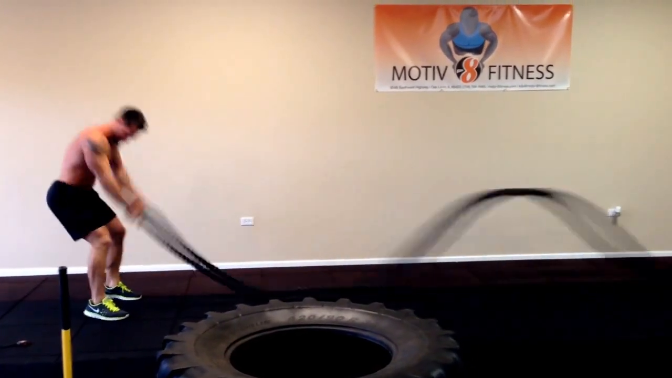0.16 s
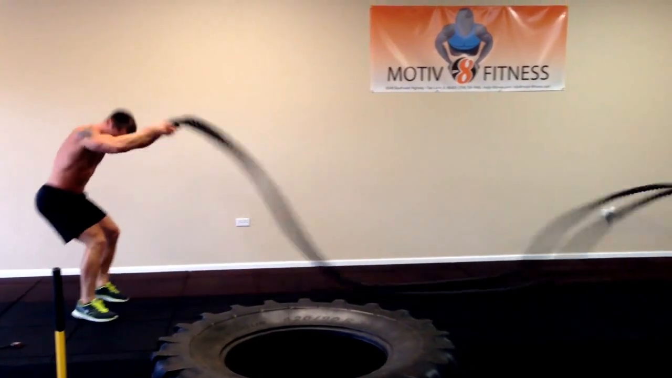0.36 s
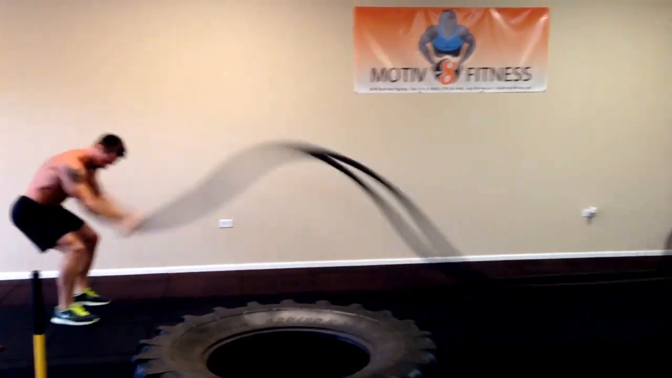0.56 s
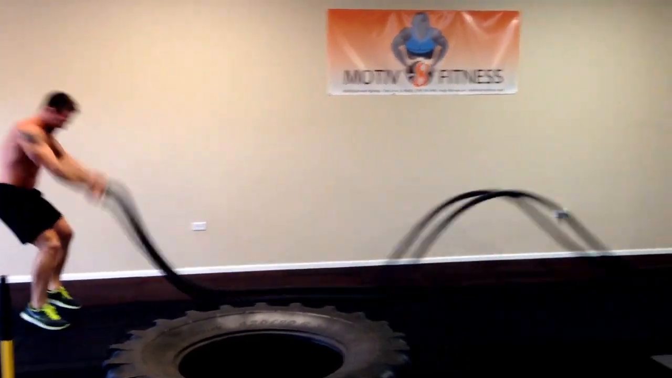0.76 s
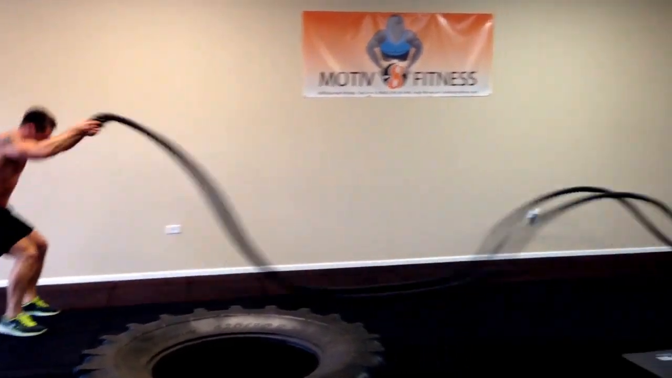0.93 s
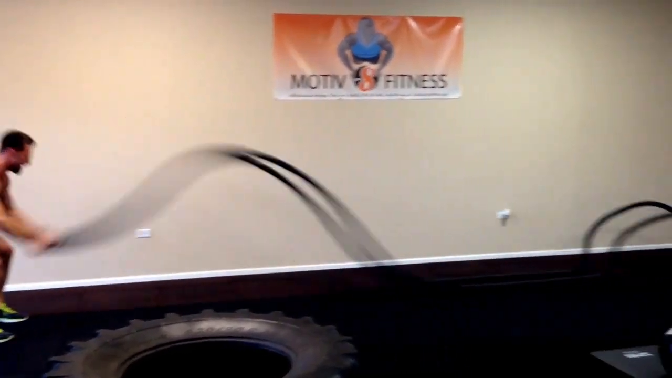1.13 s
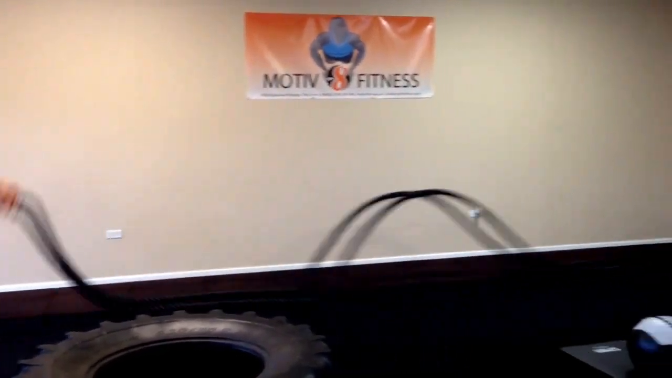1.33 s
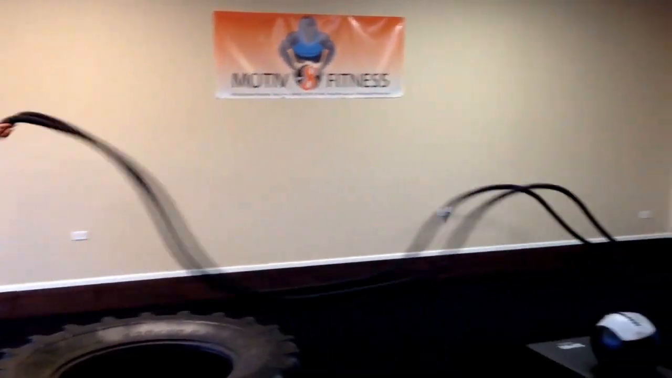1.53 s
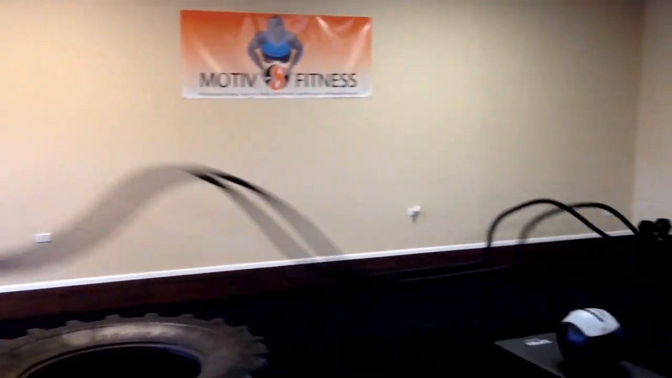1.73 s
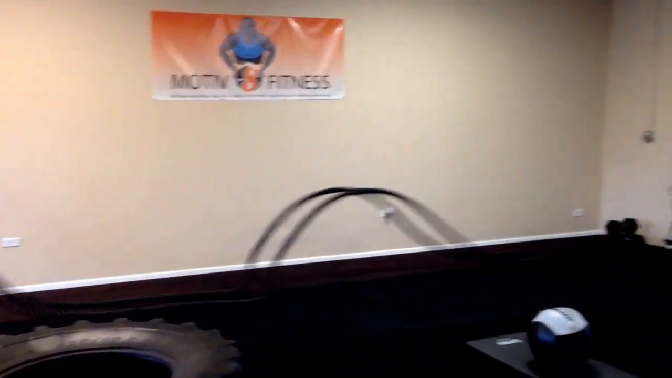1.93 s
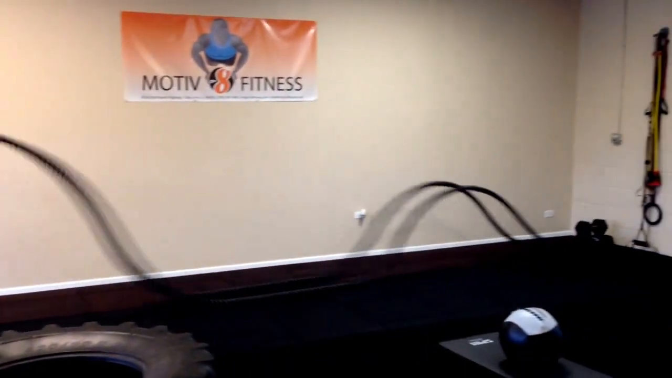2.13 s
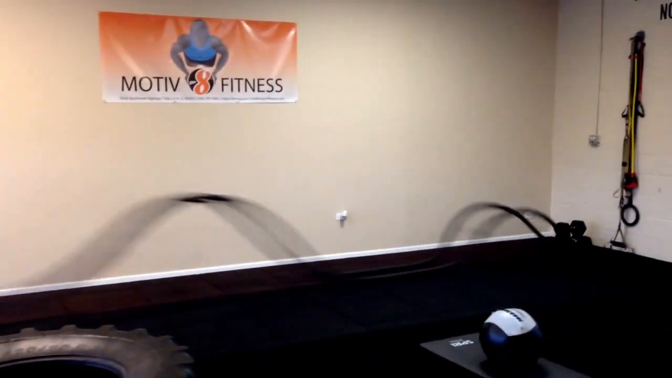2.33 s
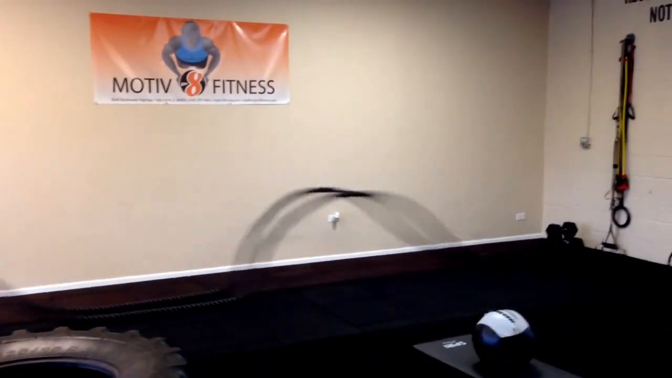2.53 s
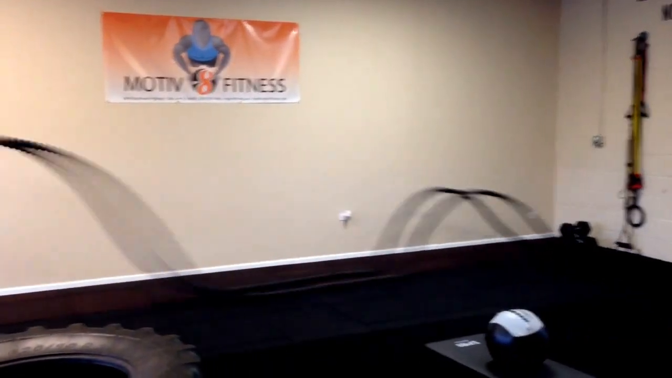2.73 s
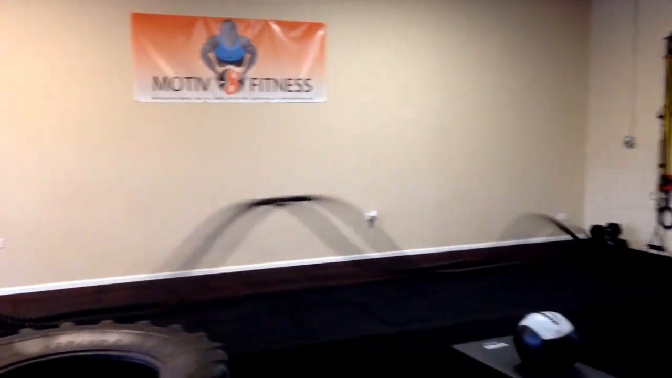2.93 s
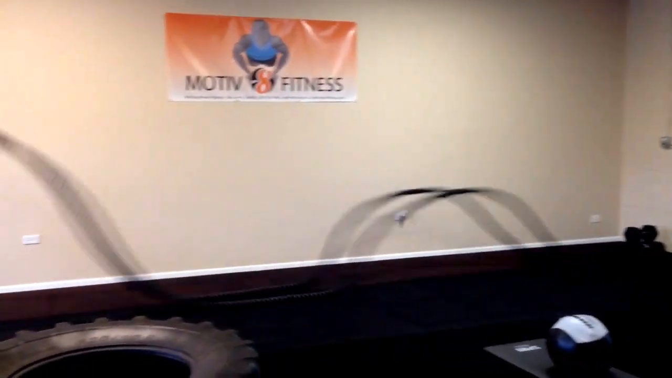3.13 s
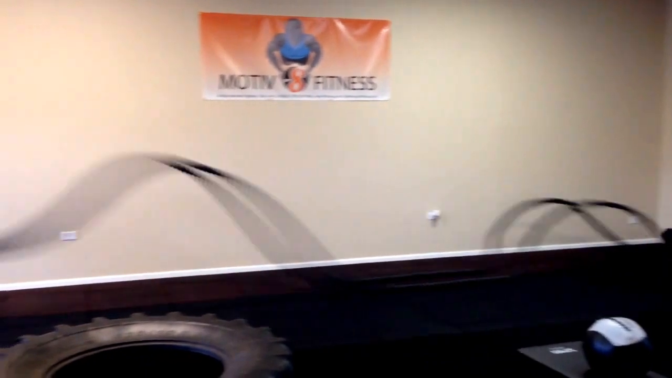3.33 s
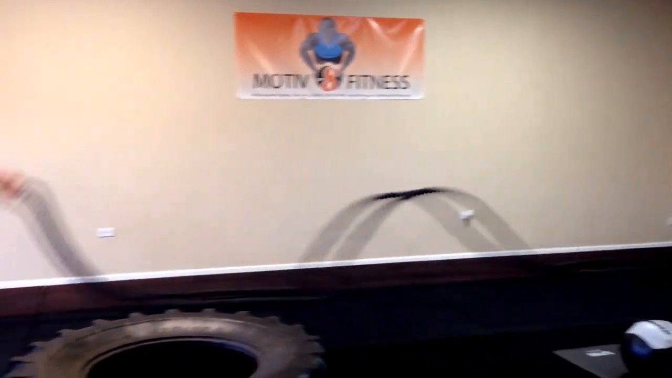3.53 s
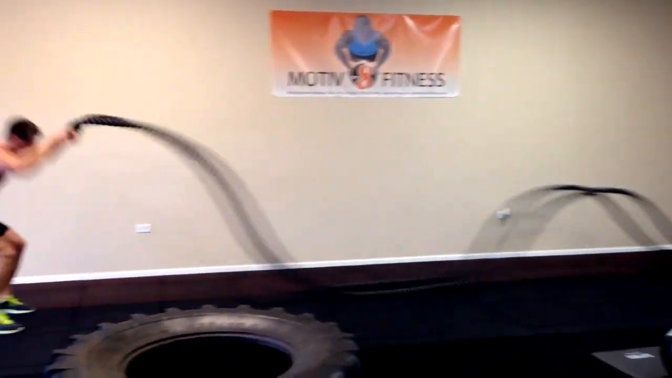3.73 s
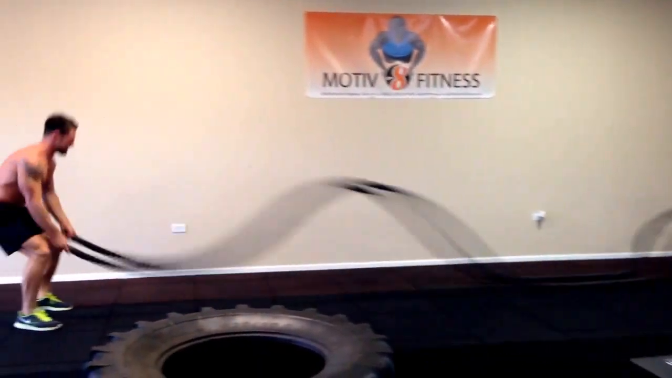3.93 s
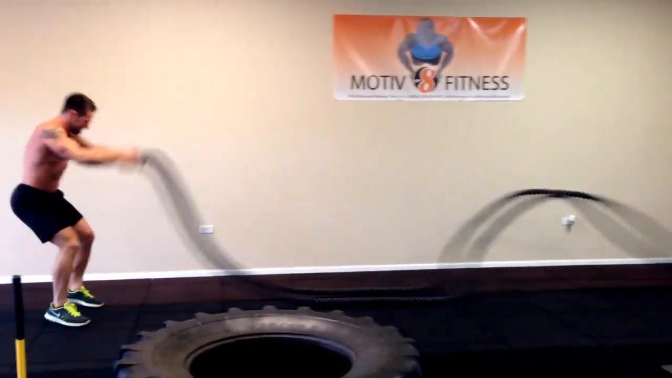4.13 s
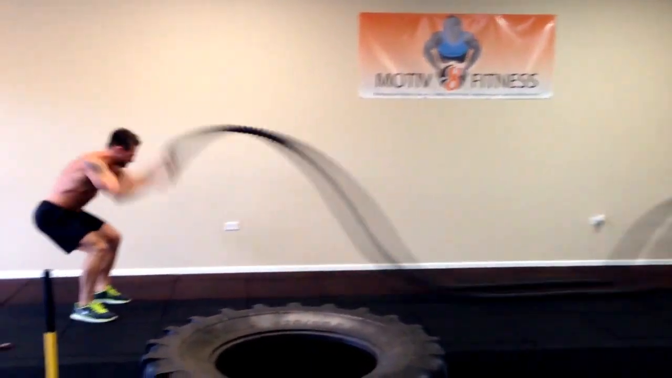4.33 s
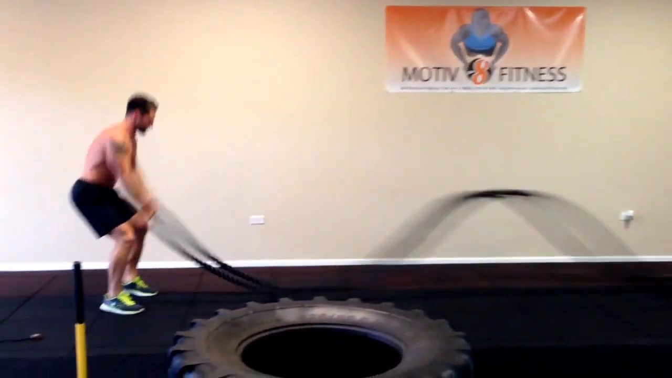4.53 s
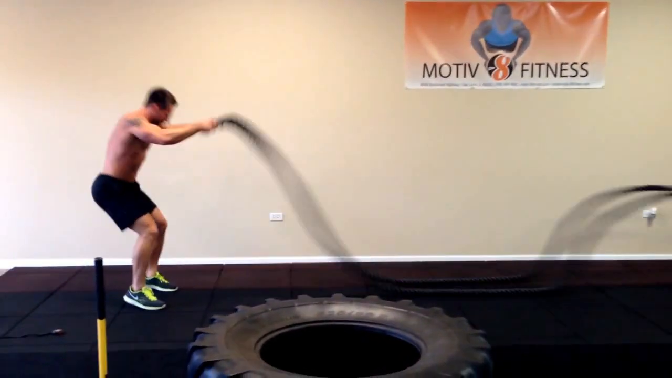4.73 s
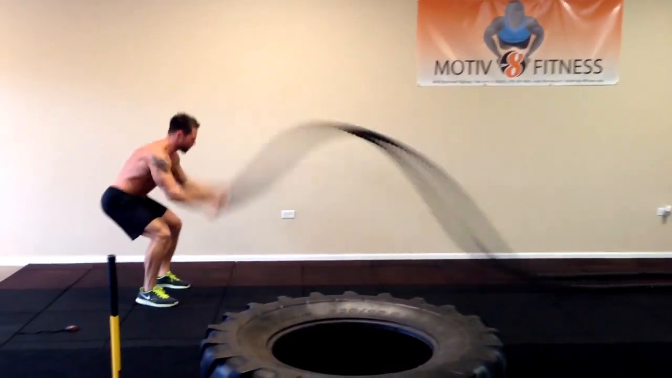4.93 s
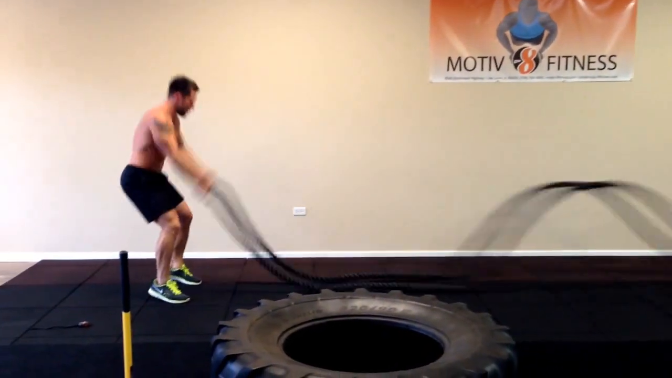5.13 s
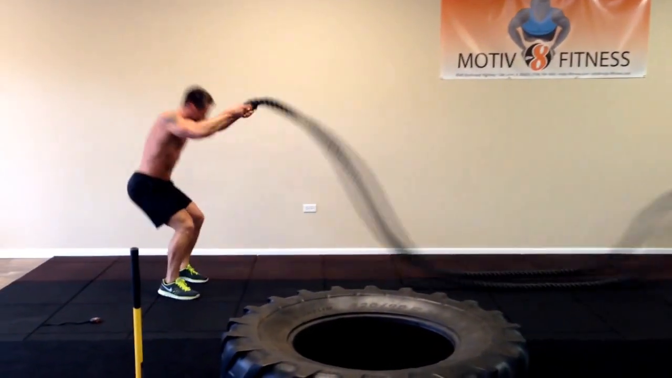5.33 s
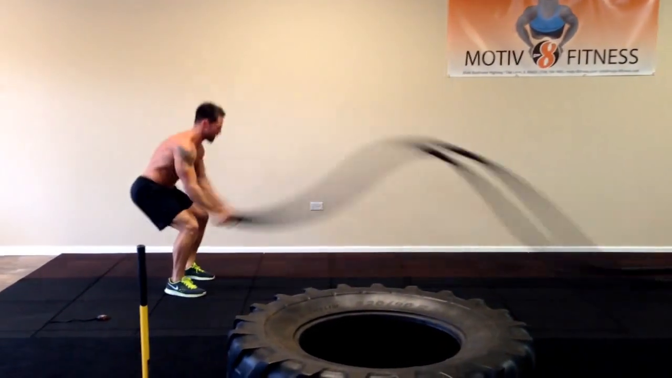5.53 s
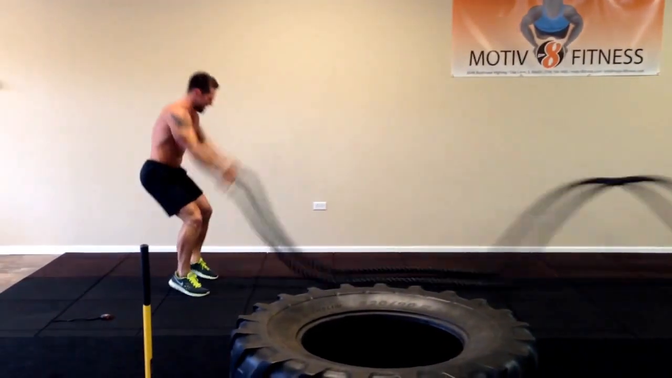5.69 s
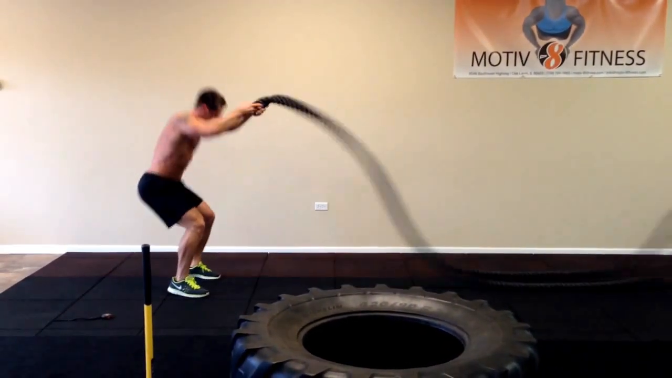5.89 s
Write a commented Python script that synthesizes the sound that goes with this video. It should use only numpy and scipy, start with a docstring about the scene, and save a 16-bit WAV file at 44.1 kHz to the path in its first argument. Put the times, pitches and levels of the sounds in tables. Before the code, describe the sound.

Steady, thudding rope slaps on a rubber mat, with faint swishes and a short boomy room echo, over low ventilation hum.

```python
"""Heavy slaps on a rubber gym floor, about two a second, as two twisted exercise ropes are slammed down.
Each begins as a swish of filtered noise, then slaps and rolls along the mat as runs of small impacts.
Noise bursts make the slack's thud and the floor's boom; the wave runs on and slaps again near the anchor.
The bare room answers every blow with decaying noise and a few standing waves, over steady ventilation."""
import sys
import numpy as np
from scipy import signal
from scipy.fft import rfft, irfft, next_fast_len
from scipy.io import wavfile
from scipy.ndimage import uniform_filter1d, minimum_filter1d, map_coordinates

SR = 44100
rng = np.random.default_rng(int(sys.argv[2]) if len(sys.argv) > 2 else 0)


def store_pcm(level_fs):
    """Save levels as 16-bit WAV."""
    pcm = np.round(np.clip(level_fs, -1, 1) * 32767).astype(np.int16)
    wavfile.write(sys.argv[1], SR, np.atleast_2d(pcm).T)


N = 267113  # samples in the scene
T = np.arange(SR) / SR  # the second in which one blow dies away, in s


def amp(db):
    """Logarithmic level: decibels become an amplitude ratio."""
    return 10 ** (np.asarray(db) / 20)


def unit(x):
    """Root-mean-square normalisation: scale to rms 1."""
    return x / np.sqrt(np.mean(x ** 2) + 1e-20)


def along(points, hz):
    """Logarithmic pitch scale: (Hz, value) points are interpolated on a log frequency axis."""
    f, v = np.transpose(points)
    return np.interp(np.log(hz + 1), np.log(f + 1), v)


def filtered(x, response):
    """Linear filtering: the spectrum is multiplied by a complex response of frequency."""
    size = 2 * next_fast_len(len(x) // 2 + 4096)
    hz = np.fft.rfftfreq(size, 1 / SR)
    return irfft(rfft(x, size) * response(hz), size)[:len(x)]


def coloured(x, points):
    """Minimum phase: folding the cepstrum gives a causal filter with the given spectrum."""
    def response(hz):
        cepstrum = irfft(np.log(amp(along(points, hz))))
        half = len(cepstrum) // 2
        cepstrum[1:half] *= 2
        cepstrum[half + 1:] = 0
        return np.exp(rfft(cepstrum))
    return filtered(x, response)


def resonances(modes, hz):
    """Damped resonance: the complex band-pass response of each (Hz, width in Hz, dB) mode."""
    return [amp(db) * 1j * hz * width / (centre * centre - hz * hz + 1j * hz * width)
            for centre, width, db in modes]


def add(track, s, x):
    """Superposition: sum x into the track from time s in seconds."""
    start = max(round(s * SR), 0)
    track[start:start + len(x)] += x[:max(N - start, 0)]


def contacts(rate_hz, scatter, rise, t60):
    """Impulse train: a dying run of small impacts; scatter makes their spacing and size uneven."""
    gaps, sizes = np.exp(scatter * rng.standard_normal((2, 1500)))
    when = (np.cumsum(gaps) - gaps[0]) / rate_hz
    place = np.minimum(when * SR, SR).astype(int)
    hits = np.bincount(place, sizes, SR + 1)[:SR]
    onset = 1 - np.exp(-(T + 1 / SR) / rise)
    return hits * onset * amp(-60 * T / t60)


def puff(rise, t60):
    """Dense-impact limit: countless tiny contacts merge into a burst of noise."""
    onset = 1 - np.exp(-T / rise)
    return rng.standard_normal(SR) * onset * amp(-60 * T / t60)


# Reverberation of the gym. Each row: frequency in Hz, time to decay by 60 dB in s.
GYM_DECAY = [(60, 0.64), (150, 1.0), (350, 0.63), (700, 0.45), (1500, 0.48), (4000, 0.57), (12000, 0.52)]


def in_gym(x, wet_db):
    """Diffuse reverberation: a blow plus the room's decaying noise, with rms 1 over its first 40 ms."""
    hz, t, z = signal.stft(rng.standard_normal(SR), SR, nperseg=256)
    decay = amp(-60 * t / along(GYM_DECAY, hz)[:, None])
    tail = signal.istft(z * decay, SR, nperseg=256)[1][:SR]
    room = amp(wet_db) * tail * (1 - np.exp(-T / 0.0045)) / np.sqrt(SR / 20)
    room[0] += 1  # direct sound
    heard = signal.fftconvolve(x, room)[:SR]
    return heard / np.sqrt(np.mean(heard[:SR // 25] ** 2))


# Spectrum of the ventilation. Each row: frequency in Hz, relative level in dB.
AIR_COLOUR = [(20, -42), (45, -20), (85, -1), (105, -18), (135, 1), (400, -3), (560, -11), (850, -18),
              (1300, -20.5), (2350, -21.5), (2650, -28.5), (6000, -31.5), (15000, -37.5)]


def room_tone():
    """Stationary noise: steady ventilation, with the dying ring of an earlier slam at the start."""
    air = amp(-48.5) * unit(coloured(rng.standard_normal(N), AIR_COLOUR))
    ring = coloured(puff(rise=0.00036, t60=0.27), FAR_KNOCK_COLOUR)
    add(air, 0, amp(-47) * in_gym(ring, wet_db=3))
    return air


# Spectrum of rope rushing through air. Each row: frequency in Hz, relative level in dB.
SWISH_COLOUR = [(500, -13), (2000, -1), (4000, 1.5), (7000, 1.5), (10000, -4.5), (15000, -19)]
# Spectrum of fibres scraping the mat. Each row: frequency in Hz, relative level in dB.
FIBRE_COLOUR = [(800, -19), (2500, -1), (4200, 9), (6500, 3), (9500, -1.5), (15000, -14)]
SWISH_DB, SCUFF_DB = -59.0, -51.5  # swish at its peak; scuff over its first 40 ms


def hiss():
    """Turbulence and friction: the ropes swish through the air, then their fibres scuff as they lie down."""
    out = np.zeros(N)
    for s, *_ in SLAMS:
        swing = np.exp(-((T - .165) / 0.096) ** 2)
        swish = swing * unit(coloured(rng.standard_normal(SR), SWISH_COLOUR))
        add(out, s - .16, amp(SWISH_DB) * swish)
        drag = (1.6 + T / 0.06) / (1 + (T / 0.085) ** 6)  # more and more rope scrapes, until it lies still
        # the fibres catch and slip: a smooth random level with 55 points a second
        grip = amp(2 * map_coordinates(rng.standard_normal(64), [T * 55], mode="nearest"))
        scuff = coloured(drag * grip * puff(rise=0.0034, t60=2.6), FIBRE_COLOUR)
        add(out, s - .001, amp(SCUFF_DB) * in_gym(scuff, wet_db=-4))
    return out


# The wave coming down near the anchor. Each row: start in seconds, knock level in dB, patter level in dB,
# time that the landing takes in s. Levels are rms over 40 ms, before standing waves and limiter.
FAR_SLAPS = [(0.404, -35.5, -32.5, 0.0019), (0.951, -33, -38.5, 0.0034), (1.526, -33.5, -37.5, 0.0044),
             (2.09, -28.5, -40, 0.0026), (2.64, -33.5, -39.5, 0.012), (3.199, -33.5, -43, 0.0097),
             (3.74, -33.5, -34, 0.0055), (4.268, -35.5, -44, .03), (4.806, -28.5, -38.5, 0.024),
             (5.361, -30.5, -35.5, 0.00337), (5.918, -30.5, -38.5, 0.0082)]
# Spectrum of the dull knock. Each row: frequency in Hz, relative level in dB.
FAR_KNOCK_COLOUR = [(50, -48), (160, -12), (260, -3.5), (335, 1), (600, -6.5), (900, -15.5), (2000, -37),
                    (6000, -82)]
# Spectrum of the patter. Each row: frequency in Hz, relative level in dB.
PATTER_COLOUR = [(300, -10.5), (650, 10), (1000, -5), (1500, -18), (2200, -28.5), (4000, -61)]
# Spectrum of the rattle. Each row: frequency in Hz, relative level in dB.
RATTLE_COLOUR = [(700, -17.5), (1400, 5.5), (2200, -11), (2900, -22), (5000, -26), (15000, -41)]
RATTLE_DB, RATTLE_FADE_DB_PER_S = -46, 2  # level at time 0 for an instant landing; fade as the set goes on
RATTLE_LOSS_DB_PER_S = 398  # the gentler the landing, the less it rattles


def far_slaps():
    """Travelling wave: the spent wave drops with a dull knock, then patter and rattle as the ropes lie down."""
    out = np.zeros(N)
    for s, knock_db, patter_db, landing in FAR_SLAPS:
        knock = coloured(puff(rise=landing + 0.003, t60=0.054 + landing), FAR_KNOCK_COLOUR)
        add(out, s + landing / 2 - .003, amp(knock_db) * in_gym(knock, wet_db=1.5))
        lying_down = contacts(900, scatter=0.33, rise=landing, t60=0.19) / (1 + (T / 0.062) ** 6)
        patter = coloured(lying_down, PATTER_COLOUR)
        add(out, s - .001, amp(patter_db) * in_gym(patter, wet_db=-6.0))
        rattle_db = RATTLE_DB - RATTLE_FADE_DB_PER_S * s - RATTLE_LOSS_DB_PER_S * landing
        rattle = coloured(lying_down, RATTLE_COLOUR)
        add(out, s, amp(rattle_db) * in_gym(rattle, wet_db=-2.0))
    return out


# Spectrum of slack rope landing. Each row: frequency in Hz, relative level in dB.
THUD_COLOUR = [(40, -30.5), (130, -15), (230, -3), (370, 6), (620, -5.5), (1000, -10.5), (1800, -31.5),
               (3000, -39.5), (15000, -83)]
# Spectrum of the floor under the ropes' weight. Each row: frequency in Hz, relative level in dB.
BOOM_COLOUR = [(25, -30), (55, -9.5), (75, -16), (110, -5), (140, -3), (190, -0.5), (300, -28), (800, -57),
               (3000, -92)]
SLACK_DB, SLACK_GROWS = -22.5, 0.26  # thud after a usual slap; dB gained per dB of slap
BOUNCE_S, BOUNCE_SPREAD_S, BOUNCE_LOSS_DB = .184, .008, 9  # the loose loops drop once more after the slap
BOOM_DB = -41.5


def thuds():
    """Inelastic impact: the slack lands with a brief scuff and bounces once; the weight shakes the floor."""
    out = np.zeros(N)
    for slam_s, slap_db, *_, slack_s in SLAMS:
        slack_db = SLACK_DB + SLACK_GROWS * (slap_db - USUAL_SLAP_DB)
        bounce_s = BOUNCE_S + BOUNCE_SPREAD_S * rng.standard_normal()
        landings = [(slam_s + slack_s, slack_db), (slam_s + bounce_s, slack_db - BOUNCE_LOSS_DB)]
        for s, db in landings:
            thud = coloured(puff(rise=0.0058, t60=0.085), THUD_COLOUR)
            add(out, s - .004, amp(db) * in_gym(thud, wet_db=-4.5))
            scuff = coloured(puff(rise=.01, t60=0.044), SNAP_COLOUR)
            add(out, s - .012, amp(db - 35.5) * in_gym(scuff, wet_db=-0.5))
        boom = coloured(puff(rise=0.035, t60=0.47), BOOM_COLOUR)
        add(out, slam_s + .062, amp(BOOM_DB) * in_gym(boom, wet_db=-8.5))
    return out


# Resonances of rope on rubber. Each row: frequency in Hz, width in Hz, level in dB.
MAT_MODES = [(320, 304, -6.5), (477, 134, 1), (639, 23, -4), (910, 190, -5.5), (1013, 415, -11)]


def mat(hz):
    """Modal response: damped resonances of alternating sign; the soft contact takes the treble away."""
    modes = sum((-1) ** k * mode for k, mode in enumerate(resonances(MAT_MODES, hz)))
    return modes / (1 + 1j * hz / 2800) ** 2


# Both ropes hitting the mat. Each row: start in seconds, slap level in dB, second rope level in dB,
# crack level in dB, first touch level in dB, wait until the slack lands in s.
# Levels are rms over 40 ms, before standing waves and limiter.
SLAMS = [(0.124, -17, -31, -36, -29.5, 0.081), (0.676, -15.5, -26.5, -32, -33.5, 0.074),
         (1.235, -21, -29, -34.5, -38.5, 0.098), (1.802, -17.5, -21, -34.5, -39, .097),
         (2.349, -16.5, -27, -36.5, -26.5, 0.045), (2.889, -20, -28, -33, -29, 0.098),
         (3.431, -17.5, -21, -40, -30, 0.092), (3.972, -24, -33, -36.5, -26, .102),
         (4.507, -23.5, -26, -36.5, -36, 0.098), (5.067, -22.5, -41, -37, -44, 0.065),
         (5.616, -20.5, -23, -39, -40, 0.09)]
# Spectrum of the rope's first touch. Each row: frequency in Hz, relative level in dB.
TOUCH_COLOUR = [(40, -44.5), (170, -5.5), (320, 1.5), (540, -1), (800, -8.5), (1400, -24), (3000, -52),
                (15000, -92)]
# Spectrum of the slapping strands. Each row: frequency in Hz, relative level in dB.
SLAP_COLOUR = [(40, -56), (150, -32), (280, 0.5), (550, -0.5), (950, -7.5), (1400, -21.5), (2000, -44),
               (3000, -41.5), (6000, -57), (15000, -89)]
# Spectrum of the rope rolling down. Each row: frequency in Hz, relative level in dB.
ROLL_COLOUR = [(40, -41), (120, -21.5), (220, -6), (340, 3), (600, -3), (950, -11), (1400, -18),
               (2000, -25), (2900, -39), (6000, -52), (15000, -97)]
# Spectrum of the crack. Each row: frequency in Hz, relative level in dB.
CRACK_COLOUR = [(500, -33), (1200, 6), (1900, -3.5), (2800, -12), (3700, -15.5), (5500, -39), (15000, -58)]
# Spectrum of the brief bite. Each row: frequency in Hz, relative level in dB.
SNAP_COLOUR = [(1500, -17), (2600, -7), (3500, 1), (4600, -13.5), (6500, -22), (15000, -60)]
USUAL_SLAP_DB = -19.5
STRAND_HZ, STRAND_HZ_PER_DB = 575.1, 13.5  # a harder slam lays the strands down faster
ROLL_DB, ROLL_GROWS = -20, 0.17  # roll after a usual slap; dB gained per dB of slap
SNAP_DB = -18  # relative to the crack


def slams():
    """Moving contact: the strands strike in quick turn, then the line of contact rolls along the mat."""
    out = np.zeros(N)
    for s, slap_db, second_db, crack_db, touch_db, _ in SLAMS:
        force_db = slap_db - USUAL_SLAP_DB
        strand_hz = STRAND_HZ + STRAND_HZ_PER_DB * force_db
        # the belly of the rope arrives just ahead
        touch = coloured(puff(rise=0.0074, t60=0.16), TOUCH_COLOUR)
        add(out, s - .015, amp(touch_db) * in_gym(touch, wet_db=3.0))
        strands = coloured(contacts(strand_hz, scatter=0.17, rise=0.00041, t60=0.12), SLAP_COLOUR)
        add(out, s - .001, amp(slap_db) * in_gym(strands, wet_db=-6))
        second_rope = filtered(contacts(strand_hz, scatter=0.291, rise=0.0022, t60=0.11), mat)
        add(out, s + .023, amp(second_db) * in_gym(second_rope, wet_db=-5))
        ripples = contacts(650, scatter=.5, rise=0.0061, t60=0.47) / (1 + (T / 0.13) ** 6)
        roll = coloured(ripples, ROLL_COLOUR)
        add(out, s, amp(ROLL_DB + ROLL_GROWS * force_db) * in_gym(roll, wet_db=-2))
        crack = coloured(contacts(2200, scatter=.6, rise=0.014, t60=0.1), CRACK_COLOUR)
        add(out, s + 0.001003, amp(crack_db) * in_gym(crack, wet_db=-5.5))
        # the hardest contact bites briefly
        snap = coloured(puff(rise=0.0025, t60=0.027), SNAP_COLOUR)
        add(out, s + .002, amp(crack_db + SNAP_DB) * in_gym(snap, wet_db=-2))
    return out


# Standing waves between the walls. Each row: frequency in Hz, width in Hz, level in dB re the direct sound.
STANDING_WAVES = [(93, 7.3, -6), (128.8, 4.5, 3), (147, 4, -14), (289, 22, -18), (619, 11, -10.5),
                  (832, 86, -6.5), (1000, 13, -36), (1966, 11, -13)]


def scene():
    """Room modes: heard from beside the ropes, standing waves lift a few notes of the blows."""
    blows = far_slaps() + thuds() + slams()
    blows = filtered(blows, lambda hz: 1 + sum(resonances(STANDING_WAVES, hz)))
    return (room_tone() + hiss() + blows)[None]


TOP_HZ = 15450


def record(dry, ceiling_db=-5):
    """Peak limiting and band limiting: a fast limiter holds the slaps down, and the band ends steeply."""
    size = SR // 200  # 5 ms
    needed = np.minimum(1, amp(ceiling_db) / (np.abs(dry[0]) + 1e-9))
    gain = uniform_filter1d(minimum_filter1d(needed, 2 * size), size)
    return filtered(dry[0] * gain, lambda hz: hz < TOP_HZ)[None]


dry = scene()
out = record(dry)
store_pcm(out)
```